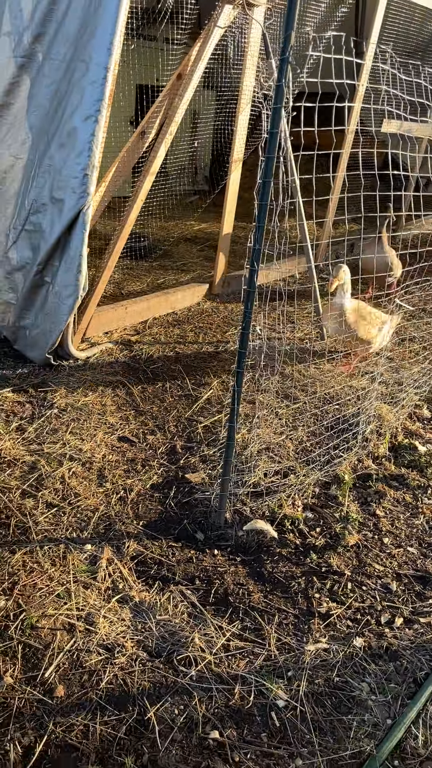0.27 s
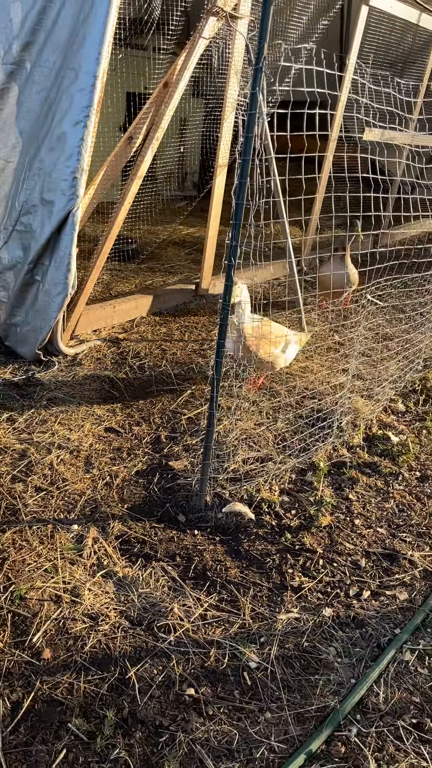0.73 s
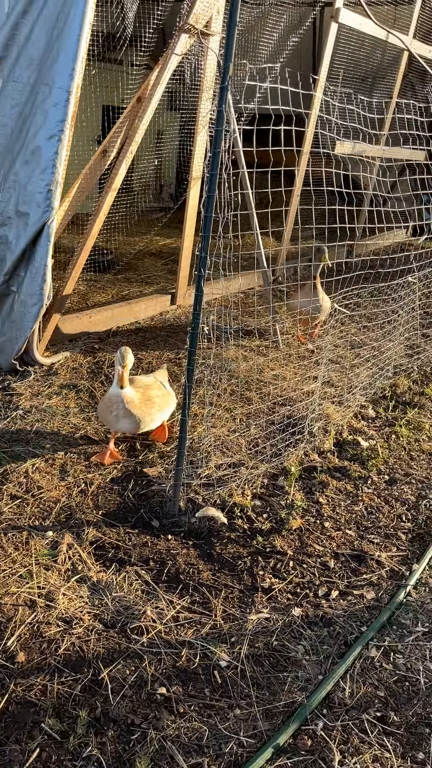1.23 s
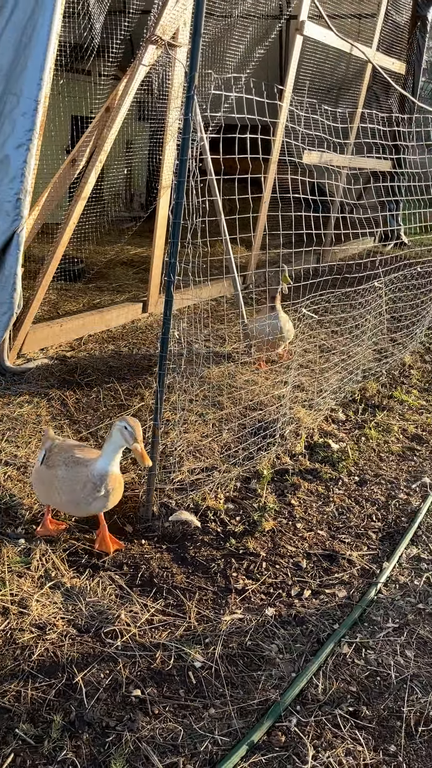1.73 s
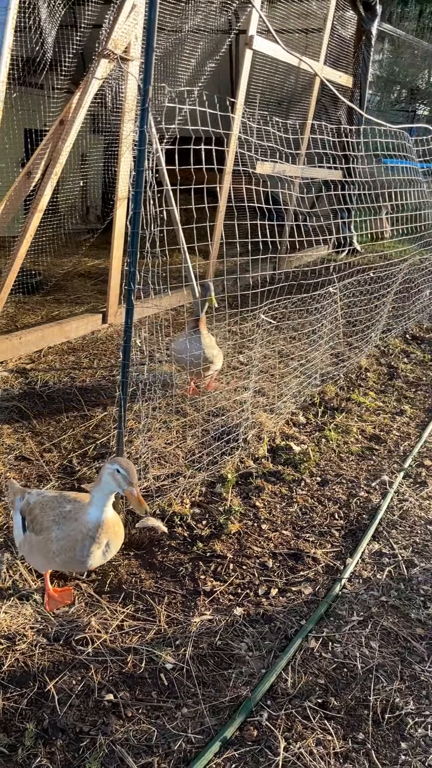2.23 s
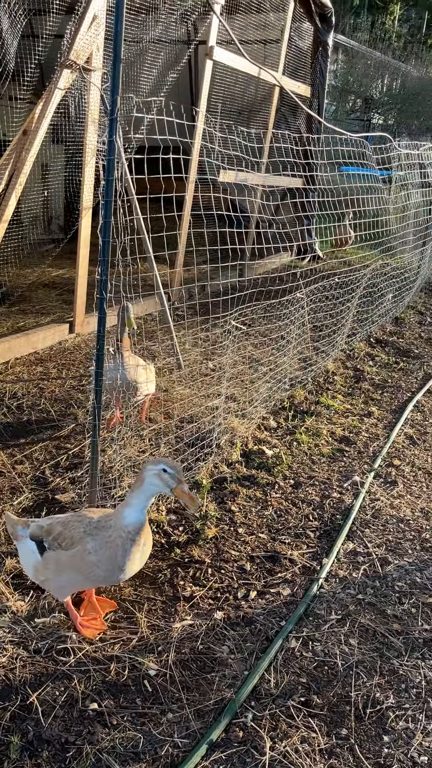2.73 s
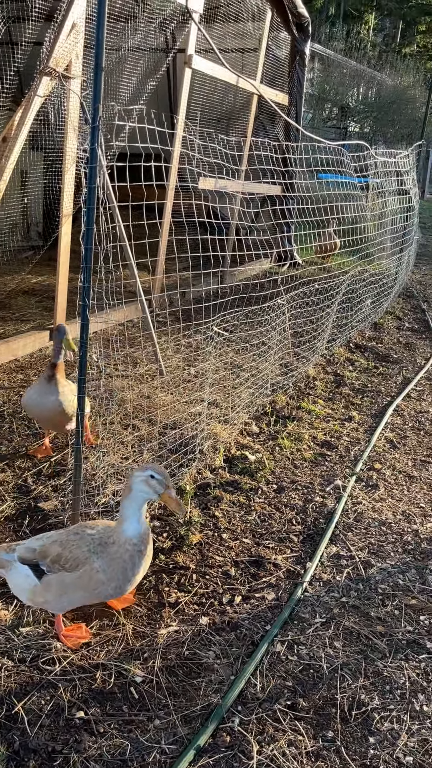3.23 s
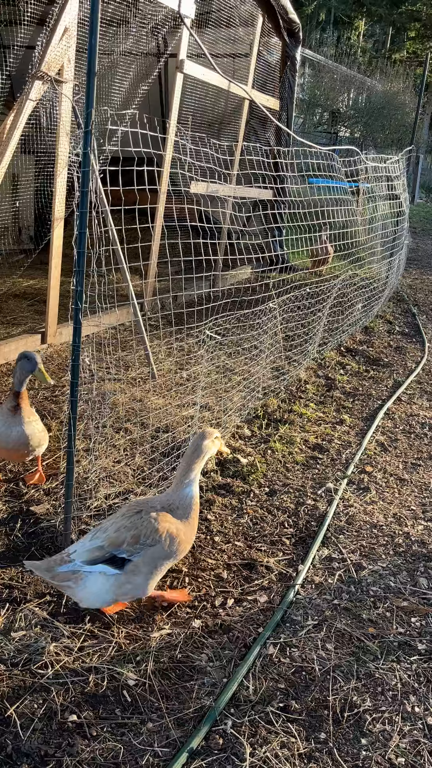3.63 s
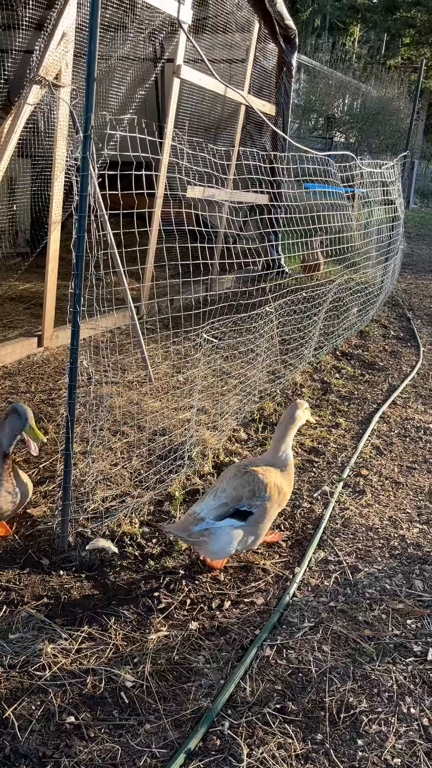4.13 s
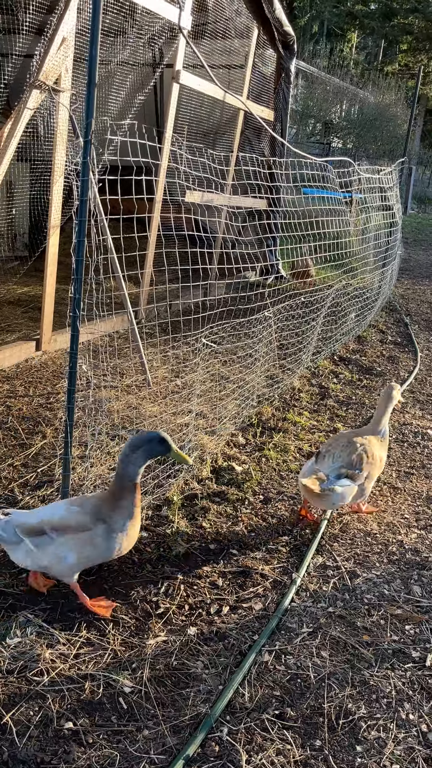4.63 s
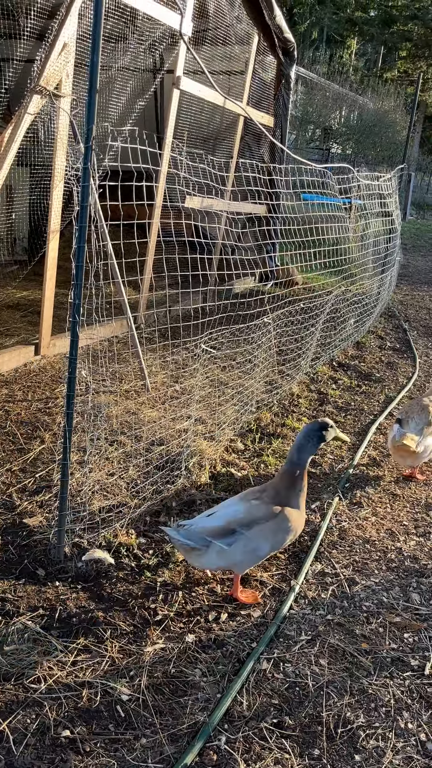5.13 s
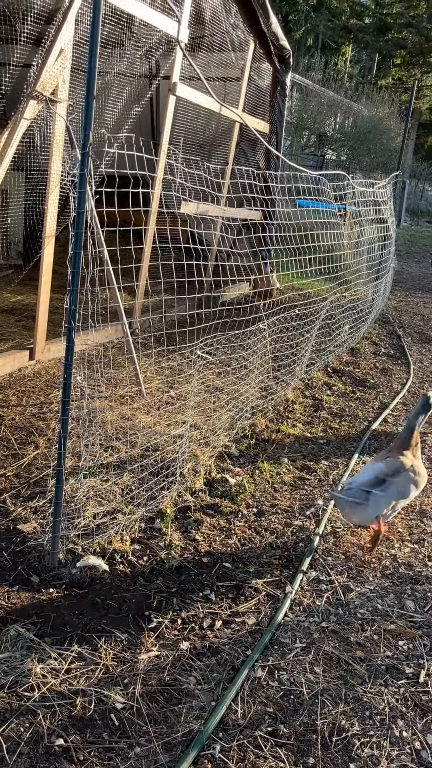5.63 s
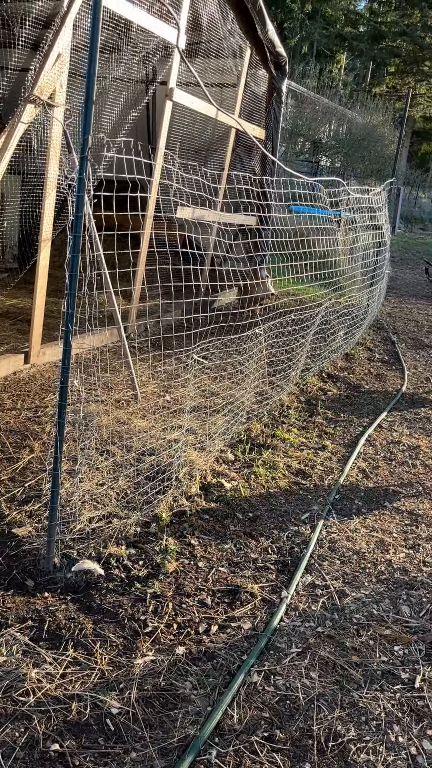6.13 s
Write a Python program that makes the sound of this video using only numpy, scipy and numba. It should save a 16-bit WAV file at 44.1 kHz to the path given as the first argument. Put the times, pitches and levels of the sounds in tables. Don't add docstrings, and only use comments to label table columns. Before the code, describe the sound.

Duck hens give low clucks, then brisk two-part quacks, sharp at the start and hoarse at the close, loudest through the middle. A drake's softer, throbbing rasps recur about every eight tenths of a second. Dull ticks and faint litter shuffles fall between. Close handheld stereo pickup in a quiet outdoor yard, slightly right, with short shed echoes and a distant low hum.

```python
import sys
import numpy as np
from scipy import signal
from scipy.fft import rfft, irfft, next_fast_len
from scipy.io import wavfile
from scipy.ndimage import uniform_filter1d, minimum_filter1d
from numba import njit

SR = 44100
rng = np.random.default_rng(int(sys.argv[2]) if len(sys.argv) > 2 else 0)


def transcribe(u):
    v = np.clip(np.atleast_2d(u).T, -1, 1)
    q = np.round(v * 32767).astype(np.int16)
    wavfile.write(sys.argv[1], SR, q)


def voltage_ratio(decibels):
    exponent = np.asarray(decibels, float) / 20
    return 10 ** exponent


N = 281343


def rms_one(x):
    return x / np.sqrt(np.mean(x ** 2) + 1e-20)


def drift(rate_hz):
    settle = 9000
    r = np.exp(-2 * np.pi * rate_hz / SR)
    noise = rng.standard_normal(N + settle)
    return rms_one(signal.lfilter([1], [1, -2 * r, r * r], noise)[settle:])


def evened(x, span_s):
    return x / np.sqrt(uniform_filter1d(x ** 2, size=int(span_s * SR)) + 1e-14)


def at_hz(points, hz):
    points = np.array(points)
    return np.interp(np.log(hz), np.log(points[:, 0]), points[:, 1])


def shaped(x, response):
    size = next_fast_len(N + 4096)
    hz = np.arange(size // 2 + 1) * SR / size + 1e-3
    return irfft(rfft(x, size) * response(hz), size)[..., :N]


@njit
def resonate(x, hz, width, sr):
    y, r = np.zeros(len(x)), np.exp(-np.pi * width / sr)
    for i in range(2, len(x)):
        drive = (1 - r * r) / 2 * (x[i] - x[i - 2])
        y[i] = drive + 2 * r * np.cos(2 * np.pi * hz[i] / sr) * y[i - 1] - r * r * y[i - 2]
    return y


def resonate_twice(x, hz, width_hz):
    once = resonate(x, hz, 1.6 * width_hz, SR)
    return resonate(once, hz, 1.6 * width_hz, SR)


def throat(x, modes):
    out = 0
    for k, (hz, width_hz, db) in enumerate(modes):
        out = out + (-1) ** k * voltage_ratio(db) * resonate_twice(x, hz * np.ones(N), width_hz)
    return out


def played(calls, fade_s):
    t, gain = np.arange(N) / SR, np.zeros(N)
    rows = np.vstack(calls)
    rows = rows[np.argsort(rows[:, 0])]
    controls = np.array([np.interp(t, rows[:, 0], column) for column in rows[:, 2:].T])
    for s, db, *columns in map(np.transpose, calls):
        span = slice(int(max(s[0], 0) * SR), int(s[-1] * SR) + 2)
        own = np.interp(t[span], s, voltage_ratio(.45 * db)) ** (1 / .45)
        own_controls = [np.interp(t[span], s, column) for column in columns]
        controls[:, span] = np.where(own > gain[span], own_controls, controls[:, span])
        gain[span] = np.maximum(own, gain[span])
    return uniform_filter1d(gain, size=max(int(fade_s * SR), 1)), *controls


def air():
    # hz, density_db_per_hz
    rumble = [(25, -32), (55, -6), (80, -3), (130, -5), (175, -10), (230, -21), (400, -27), (800, -29),
              (1400, -26), (2200, -38), (5000, -42), (6000, -64), (15000, -70)]
    # hz, first_db, last_db
    partials = [(84.7, -73.5, -64.5), (155, -57, -68.5)]
    common, own = rng.standard_normal(N), rng.standard_normal((2, N))
    bed = shaped(common, lambda hz: voltage_ratio(at_hz(rumble, hz)) / (1 + (hz / 900) ** 2))
    bed = bed + shaped(own, lambda hz: voltage_ratio(at_hz(rumble, hz)) * (0.092 + 1 / (1 + (700 / hz) ** 2)))
    t, hum = np.arange(N) / SR, 0
    for hz, first_db, last_db in partials:
        level = voltage_ratio(np.linspace(first_db, last_db, N) + 2.9 * drift(10.0))
        hum = hum + level * np.sin(2 * np.pi * hz * (t + 0.003 * drift(1.4)))
    return voltage_ratio(-51) * rms_one(bed) + np.sqrt(2) * hum


def rasps():
    # start_s, swell_s, top_db, mean_throbs_per_s, top_throat_hz
    calls = [
        (.0, .27, -34, 84, 1929),
        (.75, .33, -31.5, 86, 2004),
        (1.561, .31, -31, 83.4, 1939),
        (2.4, .25, -31, 77.7, 1849),
        (3.17, .31, -32, 89.5, 1701),
        (3.97, 0.38, -33.5, 79, 1643),
        (4.93, 0.21, -37.5, 81.7, 1624),
        (5.74, .22, -36, 82.4, 1832),
    ]
    rest_hz, mid_lift_hz, let_go_hz, even_climb_hz = 1479, 60.05, 361, 227
    attack_s, attack_db, first_db, release_s, end_db = .03, -14, -9, 0.067, -25
    out = []
    for s, swell_s, db, rate, hz in calls:
        climb_hz = hz - rest_hz
        push_db = 0.0377 * (climb_hz - even_climb_hz)
        faster = .03 * (climb_hz - even_climb_hz) / 2
        out.append([(s, db + first_db + attack_db, rate - faster, rest_hz - mid_lift_hz),
                    (s + attack_s, db + first_db, rate - faster, rest_hz),
                    (s + .38 * swell_s, db - push_db, rate, rest_hz + .65 * climb_hz + mid_lift_hz),
                    (s + swell_s, db, rate + faster, hz),
                    (s + swell_s + release_s, db + end_db, rate, hz - let_go_hz)])
    return out


def drake():
    # hz, width_hz, level_db
    modes = [(1257, 133, -6), (1560, 151.6, -1.5), (1858, 120, -2.5), (2386, 200, -5), (2800, 230, -12.5),
             (3430, 28, -15.5), (4110, 120, -13.5), (4780, 535, -17.5), (6380, 130, -28),
             (12600, 2000, -51.5)]
    gain, rate, throat_hz = played(rasps(), fade_s=0.0084)
    turns = np.cumsum(np.clip(rate, 72, 92) * (1 + .02 * drift(30))) / SR
    white, wobble, out = rng.standard_normal(N), drift(204.0), 0
    for k, (rest_hz, width_hz, db) in enumerate(modes):
        stretch = .5 if rest_hz < 2200 else .15
        centre_hz = rest_hz * (throat_hz / 1700) ** stretch
        octaves_off = np.log2(np.minimum(centre_hz, 2600) / throat_hz)
        turn = (turns - 0.66 * octaves_off) % 1
        sweep_hz = centre_hz + 1.57 * width_hz * (turn - .5)
        chirp_hz = sweep_hz + 0.32 * width_hz * np.roll(wobble, 9001 * k)
        chirp = np.sqrt(2) * np.sin(2 * np.pi * np.cumsum(chirp_hz) / SR)
        hiss = rms_one(resonate_twice(white, sweep_hz, width_hz))
        mix = .7 * chirp + .4 * hiss if rest_hz < 3200 else .8 * hiss
        throb = .2 + np.sin(np.pi * turn) ** 4
        uneven_db = 2.0 * np.roll(wobble, 5003 * k + 70000)
        effort_db = 0.13 * (rest_hz > 2200) * (20 * np.log10(gain + 1e-4) + 36)
        level = voltage_ratio(db - 9.0 * np.abs(octaves_off) + uneven_db + effort_db)
        out = out + level * np.sqrt(width_hz) * throb * mix
    return gain * evened(out, span_s=0.12)


def clucks():
    # top_s, length_s, level_db, pitch_hz, bill_hz
    calls = [(.042, .085, -27.5, 158.2, 1180), (0.555, 0.036, -29.5, 160.9, 1070),
             (.622, 0.069, -31, 159, 1200), (0.689, 0.024, -36.5, 173.3, 1320),
             (0.728, 0.03, -36, 157, 1430), (0.755, 0.039, -32, 157.3, 1160),
             (1.305, .03, -26.5, 156.4, 1100), (1.358, .075, -26.5, 185, 1497),
             (1.513, .085, -24, 159.8, 1450), (4.77, 0.023, -36.5, 180.6, 1100),
             (5.534, 0.068, -26, 194.1, 1250), (5.863, .065, -26, 237, 1390)]
    rise, sink = .52, .25
    return [[(s - rise * length, db - 17, hz * (1 + sink), bill),
             (s, db, hz, bill),
             (s + (1 - rise) * length, db - 29, hz * (1 - sink), bill)]
            for s, length, db, hz, bill in calls]


def openings():
    # top_s, length_after_top_s, level_db, pitch_hz, bill_hz
    calls = [(.398, 0.041, -19, 211.5, 1655), (1.142, .028, -15.5, 216.3, 1578),
             (1.906, 0.045, -15, 214.2, 1512), (2.143, .038, -17.5, 215.4, 1467),
             (2.377, 0.034, -15.5, 207.9, 1480), (2.677, 0.044, -15, 210.2, 1374),
             (2.921, 0.031, -14.5, 214.8, 1434), (3.268, 0.039, -14, 206.2, 1386),
             (3.501, .04, -14, 245, 1350), (3.772, 0.038, -17.5, 218.8, 1500),
             (4.04, 0.042, -20.5, 226.7, 1536), (4.53, .05, -31, 259.9, 1510),
             (4.612, .045, -21, 220.8, 1560), (4.876, 0.054, -21, 224.8, 1410),
             (5.313, 0.039, -24, 224.5, 1246), (5.395, 0.051, -21.5, 222.2, 1513),
             (5.674, .06, -20.5, 221.7, 1415), (5.975, 0.037, -21.5, 224.6, 1636),
             (6.17, .04, -27.5, 232, 1330)]
    climb_hz_per_s, out = 900, []
    for s, length, db, hz, bill in calls:
        shape = [(-.022, -30.5), (-.007, -10), (0, 0), (.65 * length, -3), (length, -17)]   # s, dB
        out.append([(s + late, db + step_db, hz + climb_hz_per_s * (late - length / 3), bill)
                    for late, step_db in shape])
    return out


def holds():
    # start_s, length_s, level_db, pitch_hz, bill_hz
    calls = [
        (.435, 0.041, -23.5, 285, 1600),
        (1.165, .055, -20.5, 288, 1567),
        (1.944, .045, -29, 263, 1350),
        (2.18, 0.039, -29.5, 245, 1445),
        (4.575, .035, -32.5, 205.2, 1550),
        (4.802, .055, -31, 160, 1293),
        (5.35, .035, -34, 218, 1470),
        (6.211, 0.053, -33.5, 306, 1400),
    ]
    edge_db, fall = -3, .06
    return [[(s, db + edge_db, hz * (1 + fall), bill),
             (s + length / 2, db, hz, bill),
             (s + length, db + edge_db, hz * (1 - fall), bill)]
            for s, length, db, hz, bill in calls]


def closings():
    # top_s, length_s, level_db, first_pitch_hz, bill_hz
    calls = [(0.495, 0.07, -19, 234.4, 1584), (1.238, 0.059, -18, 228.9, 1513),
             (1.998, 0.056, -24, 190, 1470), (2.222, 0.04, -21.5, 173.7, 1280),
             (2.441, 0.044, -22.5, 165.1, 1235), (2.754, .065, -21, 199.6, 1223),
             (2.981, 0.059, -22, 203.3, 1267), (3.354, 0.063, -23, 170.2, 1348),
             (3.56, 0.081, -20.5, 263, 1430), (3.847, 0.072, -25.5, 240.3, 1340),
             (4.123, 0.059, -25, 160.1, 1393), (4.7, .07, -28, 208.4, 1217),
             (4.966, .115, -24, 248.9, 1338), (5.46, 0.063, -29.5, 239.3, 1420),
             (5.749, 0.069, -26, 175.2, 1370), (6.027, 0.094, -22.5, 249.3, 1512),
             (6.307, 0.17, -22.5, 270.4, 1420)]
    swell, hoarse, slack_hz, bill_shuts = .47, .3, 141.1, .06
    return [[(s - swell * length, db - 13, hz, bill * (1 + bill_shuts)),
             (s, db, hz + .4 * (slack_hz - hz), bill),
             (s + hoarse * length, db - 5.5, hz + .8 * (slack_hz - hz), bill),
             (s + (1 - swell) * length, db - 30, slack_hz, bill)]
            for s, length, db, hz, bill in calls]


def hens(tone_db, neck_db, bright_db):
    # hz, width_hz, level_db
    throat_modes = [(544, 355, -18), (1180, 55.7, -2.5), (1912, 130, -5.5), (2170, 623, -14.5),
                    (3460, 120, -14), (3872, 192, -17), (4438, 79, -16.5), (4740, 433, -25),
                    (6680, 690, -40.5), (8370, 150, -41), (12400, 12000, -59.5), (15000, 1200, -43)]
    gain, pitch, bill = played(openings() + holds() + closings() + clucks(), fade_s=0.0012)
    strongest = -minimum_filter1d(-gain, size=5000)
    slack_db = np.maximum(20 * np.log10((gain + 1e-5) / (strongest + 1e-5)), -24)

    turns = np.cumsum(pitch * (1 + .04 * drift(150))) / SR
    closing = np.diff(np.floor(turns), prepend=0)
    alternate_db = (3 + 2 * drift(8)) * (-1) ** np.floor(turns)
    pulses = rms_one(closing * voltage_ratio(2 * drift(250) + alternate_db))
    breath = rms_one(rng.standard_normal(N) * np.exp(-3.0 * (turns % 1)) * voltage_ratio(2 * drift(120)))
    rough = np.clip(.42 + (195 - pitch) / 150, .42, .75)
    source = np.sqrt(1 - rough ** 2) * pulses + rough * breath

    neck = 810 * np.clip(pitch / 205, .6, 1.0) ** 0.69
    modes = [(neck, 120, neck_db + 0.8 * slack_db), (bill, 170, 0.5)]
    turning = drift(3.5)
    for k, (hz, width_hz, db) in enumerate(throat_modes):
        colour_db = bright_db * (hz > 1700) + .35 * slack_db * (1700 < hz < 6000)
        turning_db = 2.5 * np.roll(turning, 20011 * k)
        modes.append((hz * (bill / 1430) ** 0.49, width_hz, db + colour_db + turning_db))
    voice = evened(throat(source, modes), span_s=0.03)

    phase = 2 * np.pi * np.cumsum(pitch * (1 + 0.0525 * drift(52.8))) / SR
    tone_level = voltage_ratio(tone_db + 0.022 * slack_db) * np.clip((pitch - 100) / 80, 0, 1)
    return gain * (voice + tone_level * (np.sin(phase) + 0.2 * np.sin(2 * phase)))


def steps():
    # start_s, length_s, level_db
    shuffles = [
        (0.281, 0.19, -54),
        (1.57, 0.13, -49.5),
        (1.787, 0.075, -47.5),
        (3.024, 0.042, -43.5),
        (3.164, 0.088, -48),
        (4.158, 0.053, -42.5),
        (4.285, 0.13, -47),
        (5.573, 0.079, -60),
        (5.779, 0.036, -43.5),
    ]
    gain = np.zeros(N)
    for s, length_s, db in shuffles:
        size = int(length_s * SR)
        gain[int(s * SR):][:size] = voltage_ratio(db) * np.hanning(size)
    grains = rng.standard_normal(N) * voltage_ratio(3.2 * drift(100))
    dull = signal.butter(2, [220, 900], "band", fs=SR, output="sos")
    return gain * rms_one(signal.sosfilt(dull, grains))


def ticks():
    # start_s, peak_db, knock_hz, crack_db
    hits = [(0.318, -29.5, 1160, -12), (1.075, -23, 1107, -40), (1.432, -23.5, 1380, -55),
            (2.094, -26.5, 980, -30), (2.319, -20, 1370, -44), (2.868, -27, 1064, -40), (3.1, -50, 432, -3),
            (3.456, -19, 1513, -35), (3.932, -42, 561.7, -17), (3.974, -33, 780, -27.5),
            (5.122, -34, 1450, -24)]
    size = 1500
    out, t = np.zeros(N + 2000), np.arange(size) / SR
    for (s, db, hz, crack_db), noise in zip(hits, rng.standard_normal((len(hits), size))):
        knock = np.sin(2 * np.pi * hz * t) * np.exp(-t / 0.0022)
        knock = knock + 0.059 * noise * np.exp(-t / 0.009) * np.sin(2 * np.pi * 1400 * t)
        crack = voltage_ratio(crack_db) * np.diff(noise, prepend=0) * np.exp(-t / 0.0019)
        start = int(s * SR)
        out[start:start + size] += voltage_ratio(db) * (signal.lfilter([.3], [1, -.7], knock) + crack)
    return out[:N]


def peeps():
    # start_s, length_s, first_hz, top_hz, last_hz, level_db
    whistles = [
        (3.128, 0.06, 1580, 2002, 1150, -46.5),
        (5.83, 0.064, 3830, 4233, 3997, -69),
    ]
    out = np.zeros(N)
    for s, length_s, first_hz, top_hz, last_hz, db in whistles:
        size = int(length_s * SR)
        arch = np.sin(np.pi * np.arange(size) / (length_s * SR))
        hz = np.linspace(first_hz, last_hz, size) * (1 - arch) + top_hz * arch
        out[int(s * SR):][:size] = voltage_ratio(db) * arch * np.sin(2 * np.pi * np.cumsum(hz) / SR)
    return out


def yard(x):
    # delay_s, level_db
    echoes = [(.0063, -5), (.013, -28), (0.025, -18), (.043, -15), (.068, -29), (0.102, -28)]
    length = int(.2 * SR)
    t, noise = np.arange(length) / SR, rng.standard_normal((2, length))
    smear = sum(voltage_ratio(db) * (t > s) * np.exp(-(t - s) / 0.0021) for s, db in echoes)
    band = signal.butter(2, [250, 11000], "band", fs=SR, output="sos")
    tail = signal.sosfilt(band, 0.072 * smear * noise)
    return signal.fftconvolve(x[None], tail, axes=1)[:, :N]


def ports(x):
    # hz, width_hz, level_db
    dips = [(1005, 360, -4), (2454, 110, -15.5), (5780, 170, 1), (10700, 5500, -5.5)]
    # hz, level_db
    left_level = [(60, 0.0), (110, 0.0), (200, 0.0), (380, -0.5), (700, -3.5), (1290, -4.5), (2380, -2.0),
                  (4400, -1.5), (8120, 0.0), (15000, 0.0)]
    # hz, phase_rad
    left_lead = [(0, 0), (950, -1.3), (1210, -0.3), (1640, -0.2), (2580, 2.2), (5000, 1.4), (7580, 6.0),
                 (8870, 6.8), (9730, 9.4), (10900, 9.5), (11800, 12.5), (13000, 12.6), (14000, 15.4),
                 (16000, 16.3)]
    side = np.array([[.5], [-.5]])

    def response(hz):
        dips_db = sum(db / (1 + (2 * (hz - at) / width_hz) ** 2) for at, width_hz, db in dips)
        lead_rad = side * np.interp(hz, *np.transpose(left_lead))
        return voltage_ratio(dips_db + side * at_hz(left_level, hz)) * np.exp(1j * lead_rad)

    return shaped(x, response)


def scene():
    # time_s, left_right_db, chest_tone_db, neck_db, bright_rasp_db
    walk = [
        (0, -0.5, -12.5, -7, -3.5),
        (1.7, -1, -14.5, -2.5, -0.5),
        (2.6, 0, -13, -6.5, -2.5),
        (3.4, 0, -13.5, -5, -7),
        (4.5, -0.5, -10.5, -1, -8),
        (4.899, -1, -12, -12, -4),
        (5.5, -1.5, -12.5, -14, -2),
        (6.38, -1, -12, -33.5, -6.5),
    ]
    s, *columns = np.transpose(walk)
    pan_db, *colour_db = [np.interp(np.arange(N) / SR, s, column) for column in columns]
    flock = hens(*colour_db) + drake() + ticks() + peeps() + steps()
    side = np.array([[.5], [-.5]])
    return voltage_ratio(side * pan_db) * ports(flock) + voltage_ratio(-1.5) * yard(flock) + air()


def roll_off(x):
    return signal.sosfilt(signal.butter(12, 16470, fs=SR, output="sos"), x)


def record(dry):
    rounded = 0.82 * np.tanh(dry / 0.76)
    cut = signal.cheby2(10, 60, 16200, fs=SR, output="sos")
    return roll_off(signal.sosfilt(cut, rounded))


dry = scene()
out = record(dry)
transcribe(out)
```